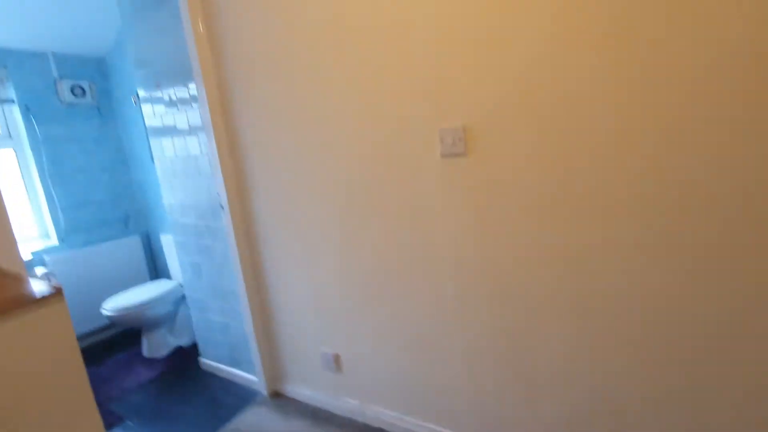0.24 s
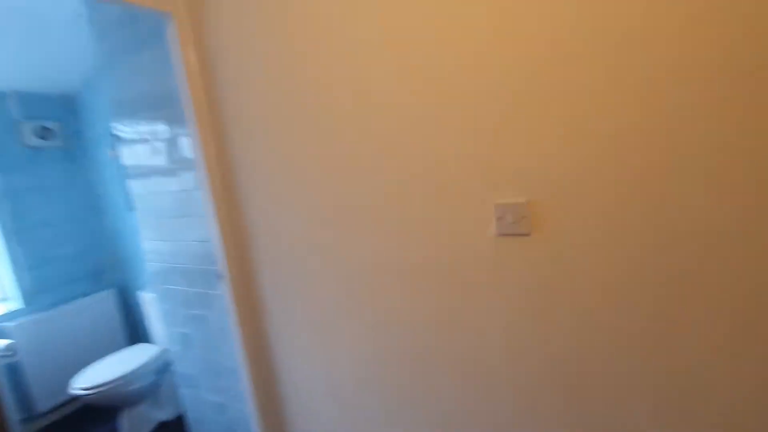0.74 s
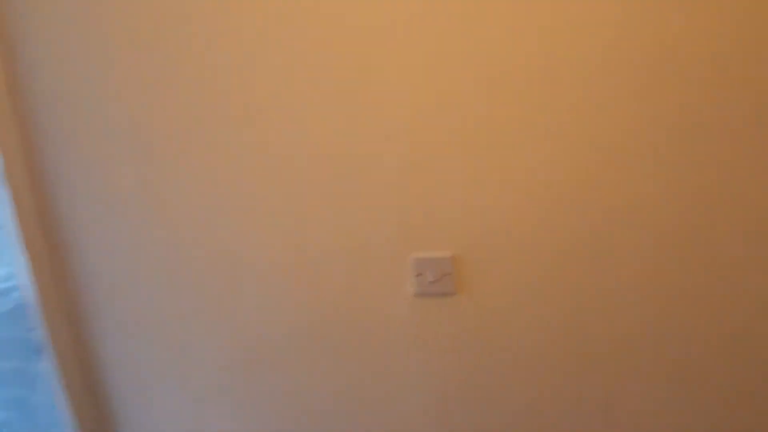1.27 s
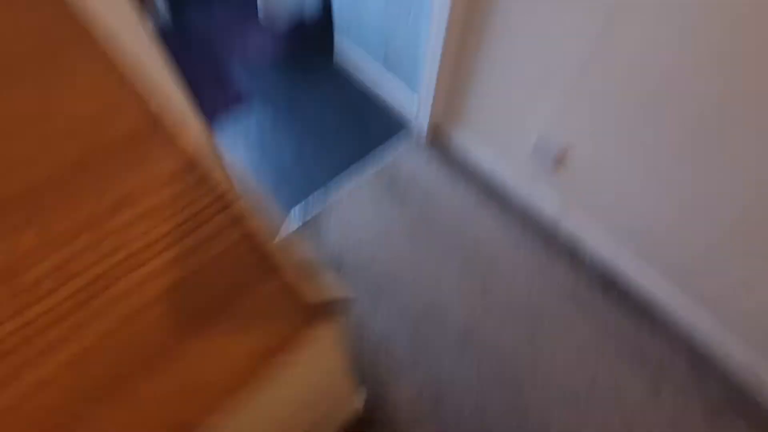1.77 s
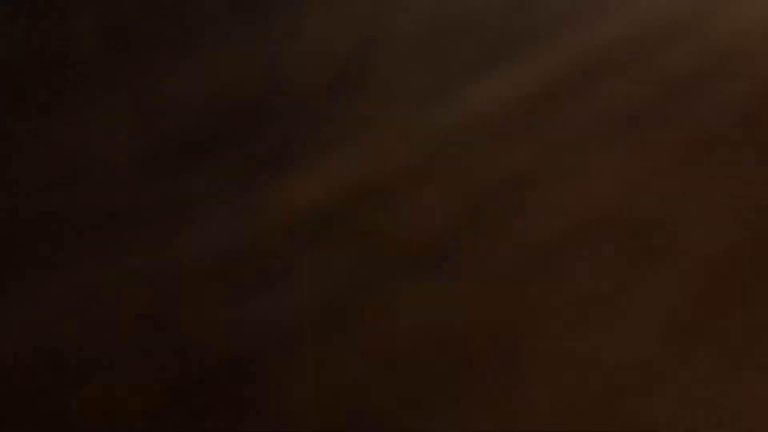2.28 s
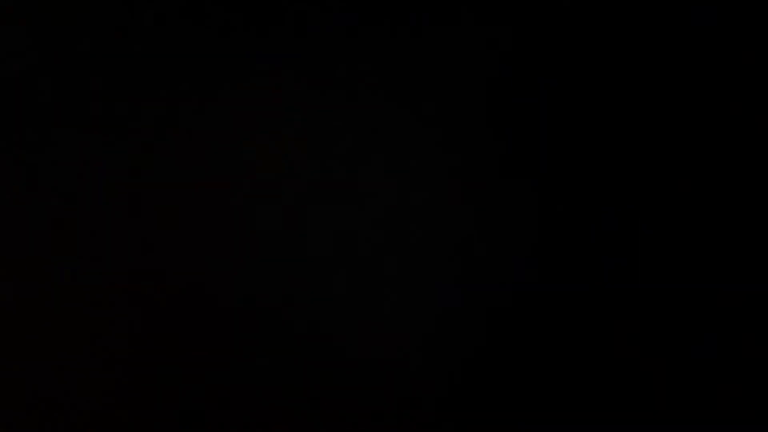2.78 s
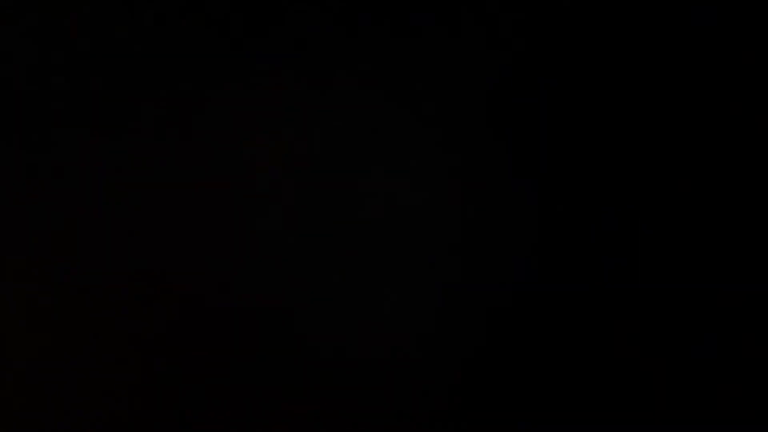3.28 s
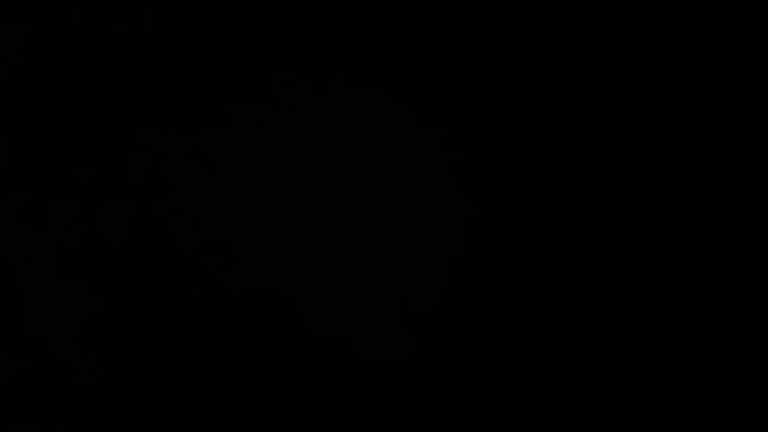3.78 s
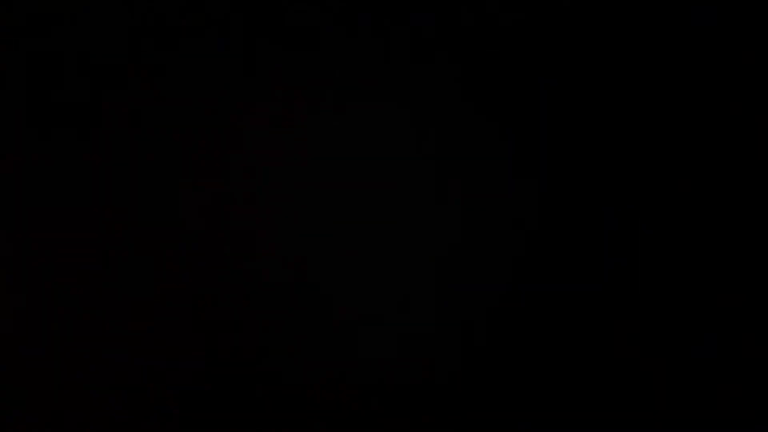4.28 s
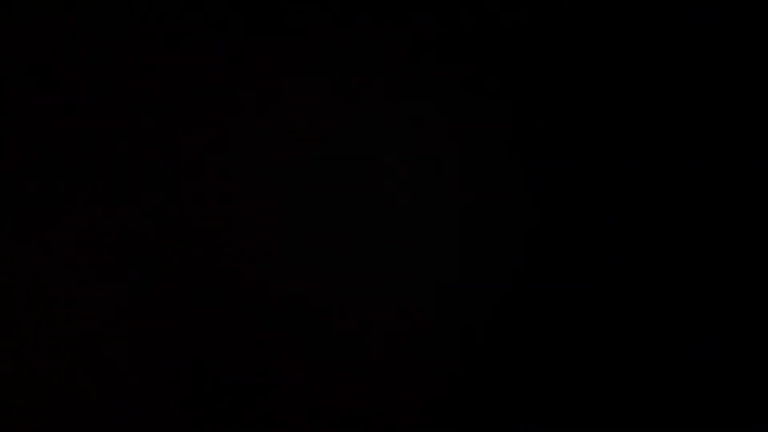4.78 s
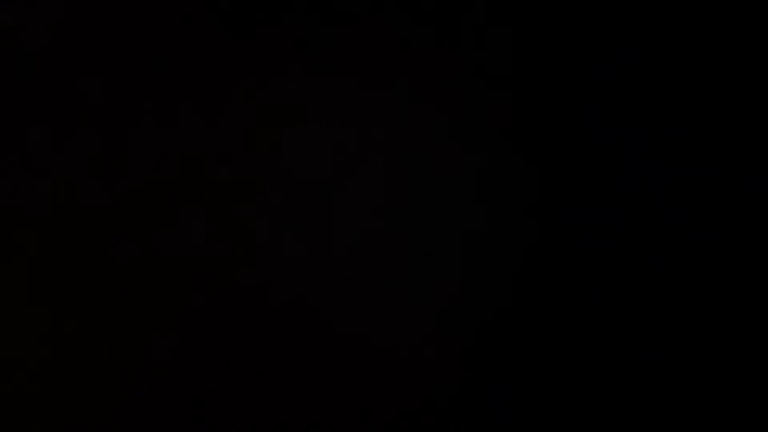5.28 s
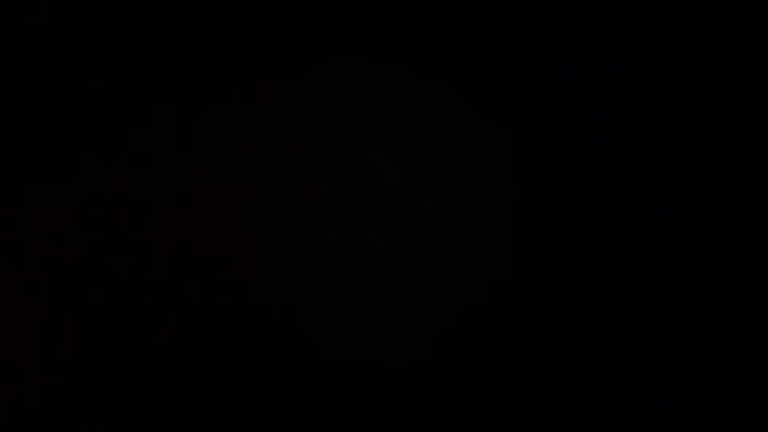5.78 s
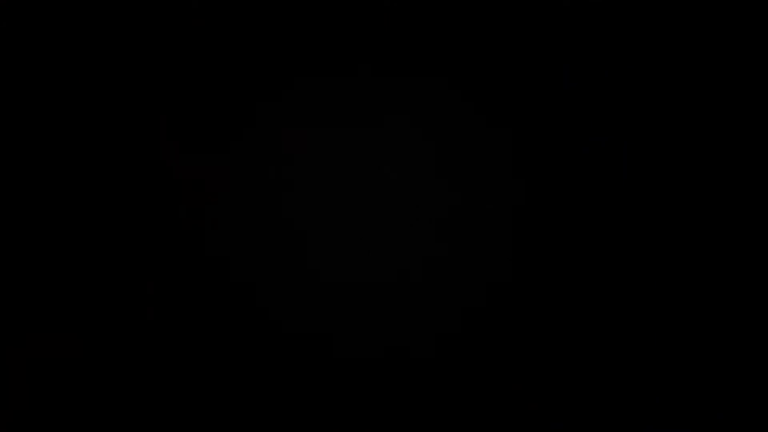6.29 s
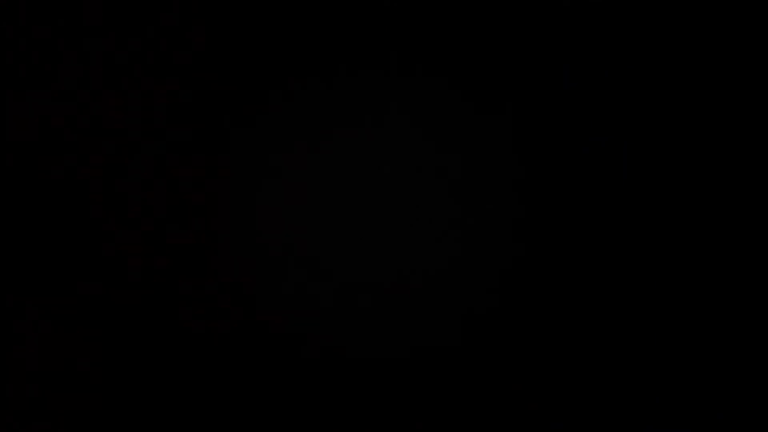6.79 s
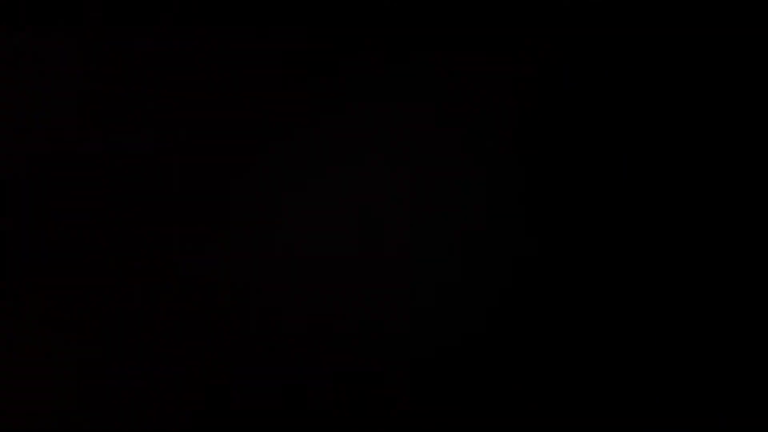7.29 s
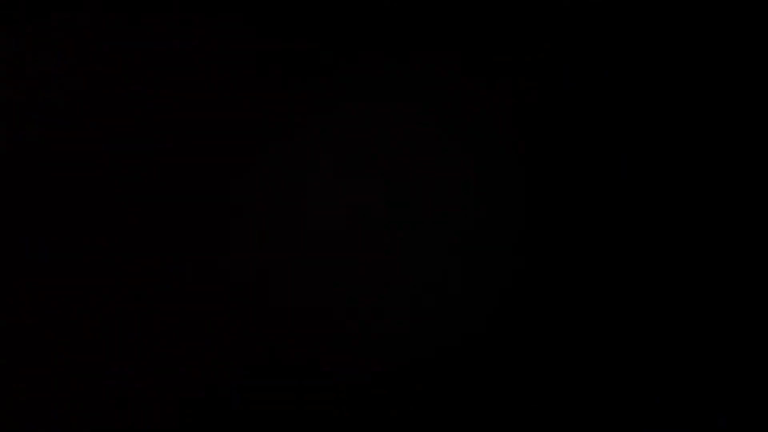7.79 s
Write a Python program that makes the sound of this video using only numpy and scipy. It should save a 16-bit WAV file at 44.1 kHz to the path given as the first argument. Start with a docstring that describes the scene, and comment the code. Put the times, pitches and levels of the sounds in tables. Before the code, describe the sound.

For the first second, soft footsteps thud and scuff on carpeted stairs, with a sleeve swishing close to a handheld phone. From about 1.4 to 2 seconds, air buffets the microphone with a low rumble as it swings down. Between 2.1 and 2.5 seconds the phone clatters onto a wooden top in several quick, hollow knocks. A quiet stretch follows, with cloth and fingers rubbing right at the microphone, small clicks, a light distant tap near 3.2 seconds and faint footfalls through the wood. At 5.7 seconds a loud bump booms through the wood and briefly rings in the small landing. Plastic case clicks, scratchy rubbing and lighter knocks follow, then more heavy bumps come at about 6.8 and 6.9 seconds. The rubbing fades over a low floor rumble, with one soft thud around 8 seconds.

```python
"""Knocks booming through a wooden top on a small landing, heard from a phone lying face down on it.
The phone is first carried by hand over carpeted stairs, with soft footfalls and a swishing sleeve.
It swings down, air buffeting its two microphone ports, and clatters onto the wood at about 2.2 s.
Then cloth and fingers rub right at the ports, the plastic case clicks, soft footfalls thud faintly
through the wood, and a few heavy bumps ring it and the room. Underneath, the floor rumbles."""
import sys
import numpy as np
from scipy import signal
from scipy.fft import rfft, irfft, next_fast_len
from scipy.io import wavfile
from scipy.ndimage import uniform_filter1d

SR = 44100
rng = np.random.default_rng(int(sys.argv[2]) if len(sys.argv) > 2 else 0)


def unload_wav(signal):
    """Save mono or channel-first audio to the path in sys.argv[1] as 16-bit WAV at rate SR, clipped to [-1, 1]."""
    wavfile.write(
        sys.argv[1],
        SR,
        np.round(np.clip(np.atleast_2d(signal).T, -1, 1) * 32767).astype(np.int16),
    )


N = 354563
T = np.arange(N) / SR
AGE = np.arange(SR) / SR  # time since a sound's onset, s
TOP_HZ = 16000  # upper limit of the microphone


# modes of the wooden top on its frame: f/Hz, level/dB, t60/s
WOOD_MODES = [(56.6, -5.5, 0.45), (86.5, -9.5, 0.17), (112.5, 7, 0.092), (147.5, 11, 0.056),
              (187, 3.5, 0.092), (237, -12, 0.42), (315.6, -5, 0.19), (406, -7, .27), (463, -8.5, 0.39),
              (634, -9.5, 0.23), (721, -17.5, 0.056)]
# knocks on the wood, and soft footfalls thudding faintly through it: t/s, boom/dB, contact bandwidth/Hz,
# boom pan/dB, room/dB, crack/dB, crack cut-off/Hz, crack pan/dB (every pan is left minus right)
KNOCKS_AND_THUDS = [(2.13, -31, 600, -26.5, -52, -35, 610, -32),
                    (2.2053, -25.5, 470, 10.5, -22.5, -25, 3384, 47),
                    (2.2897, -26, 423, 13.5, -31.5, -25.5, 3220, 24),
                    (2.303, -29.5, 300, 5.5, -40, -47, 4850, 9),
                    (2.391, -26.5, 334, 5, -29.5, -24, 3360, 27),
                    (2.5193, -32.5, 500, -13.5, -43.5, -35.5, 2900, 22),
                    (2.5304, -18.5, 481, 4, -26, -27.5, 2647, 11),
                    (3.503, -59, 70.3, 3.5, -83.5, -90.5, 500, 2),
                    (4.385, -63.5, 68.4, 1.5, -63.5, -90.5, 500, 3),
                    (5.424, -41, 210, 4, -39.5, -77, 687, 3), (5.681, -11, 248.3, 6, -25.5, -26.5, 450, 23),
                    (6.221, -47, 400, 7, -47.5, -52, 2820, 11),
                    (6.338, -48.5, 400, 5.5, -46, -58, 2430, 15),
                    (6.369, -37.5, 300, 6.5, -46.5, -52, 1000, 14),
                    (6.432, -49.5, 300, 6.5, -44.5, -52, 2000, 14),
                    (6.583, -27.5, 272.6, 8, -36.5, -40, 680, 28),
                    (6.7741, -15.5, 69, 7.5, -24.5, -29.5, 1920, 11),
                    (6.8802, -17.5, 253, 5, -26.5, -27.5, 700, 32),
                    (6.8865, -14, 312.4, 3.5, -26, -26.5, 700, 5),
                    (7.344, -50.5, 60.8, 10, -84, -97, 500, -4),
                    (8.016, -42, 58.3, -15, -56, -67, 1494, -21)]

def knocks_and_thuds():
    """Through the wood the phone lies on: knocks crack and ring it; soft footfalls stir its low modes."""
    out = np.zeros((2, N))
    for row in KNOCKS_AND_THUDS:
        start, boom_db, contact_hz, boom_pan_db, room_db, crack_db, crack_hz, crack_pan_db = row
        # each port hears the same modes in its own mixture
        wood = np.stack([ring(WOOD_MODES, scatter_db=0.54) for _ in range(2)])
        boom = burst(cut(cut(wood, contact_hz), 39, "high", order=6))
        # one sharp push, then a short chatter of the surfaces
        push = (AGE == 0) + amp(-21) * rng.standard_normal((2, SR)) * fade(0.011)
        crack = cut(push, crack_hz, order=4) + amp(1) * cut(push, crack_hz, order=2)
        crack = burst(cut(crack, 310, "high"))
        near = amp(boom_db) * pan(boom_pan_db) * boom + amp(crack_db) * pan(crack_pan_db) * crack
        room = landing_reverb(bright_hz=2.4 * contact_hz + 0.23 * crack_hz)
        add(out, start, near + amp(room_db) * pan(0.31 * boom_pan_db) * room)
    return out


# decay of the landing's diffuse tail: band top/Hz, t60/s
ROOM_DECAY = [(160, 0.45), (450, 0.3), (1100, .38), (3000, 0.25), (16000, 0.27)]
# spectrum of that tail: f/Hz, level/dB
ROOM_SPECTRUM = [(30, -28.5), (42, -9.5), (54, 7), (75, 4), (115, -5.5), (200, 0.5), (260, -0.5),
                 (315, -2.5), (390, -8.5), (600, -12), (1100, -20.5), (1600, -21), (2500, -26.5),
                 (7000, -46.5), (16000, -63.5)]
# standing waves between the walls: f/Hz, level/dB, t60/s
ROOM_MODES = [(81.3, -1, 0.33), (114.4, -4, .38), (142, -4, 0.4), (195.4, -4, 0.5), (237, -1, .38),
              (314, 0.5, 0.25), (402, -2, 0.15), (481, -7.5, 0.32), (598, -10, 0.36)]

def landing_reverb(bright_hz):
    """All round the phone: the landing's answer builds briefly, and the bass lasts longest."""
    rest, tail = noise(SR, alike_hz=240), 0
    for top_hz, t60 in ROOM_DECAY:
        band = cut(cut(rest, top_hz)[:, ::-1], top_hz)[:, ::-1]  # both ways, so no phase shift
        rest = rest - band
        tail = tail + band * fade(t60)
    standing = np.stack([ring(ROOM_MODES, scatter_db=4.5) for _ in range(2)])
    standing *= 1 - np.exp(-AGE / 0.0091)
    diffuse = colour(tail * (1 - np.exp(-AGE / 0.0018)), ROOM_SPECTRUM)
    return burst(cut(burst(diffuse) + amp(-3) * burst(standing), bright_hz))


# footfalls on the stairs: t/s, thud/dB, scuff/dB, rise/s, decay/s
STEPS = [(0.0, -28.5, -47.5, 0.00034, 0.31), (0.059, -33.5, -48.5, 0.084, 0.067),
         (0.134, -30.5, -42, 0.044, 0.06), (0.196, -31, -44.5, 0.0045, 0.028),
         (.6005, -29, -39.5, 0.0055, 0.12), (.745, -36.5, -49.5, 0.017, 0.07),
         (.79, -36.5, -43, 0.016, 0.02), (1.788, -37, -39, 0.0017, 0.013),
         (3.9, -54.5, -66.5, 0.018, 0.098), (4.766, -57.5, -50, 0.051, 0.02)]
# spectra of the padded thud and of the sole's scuff: f/Hz, level/dB
THUD_SPECTRUM = [(25, -12.5), (55, -3.5), (90, 10), (150, 3), (220, 1), (310, 2), (450, -6), (700, -14),
                 (1400, -27.5), (4000, -62)]
SCUFF_SPECTRUM = [(200, -33), (700, 4), (1500, -3.5), (2700, -6), (4200, -13.5), (6300, -17.5),
                  (7600, -27.5), (11000, -26.5), (16000, -55.5)]

def footsteps():
    """On the stairs nearby: each foot thuds into the carpet and scuffs its fibres."""
    out = np.zeros((2, N))
    stairwell = amp(-3) * fade(0.44)  # both sounds linger
    for start, thud_db, scuff_db, rise, decay in STEPS:
        release = np.exp(-np.maximum(AGE - rise, 0) / decay)
        press = np.minimum(AGE / rise, 1) * (release + stairwell)
        thud = burst(colour(noise(SR, alike_hz=350) * press, THUD_SPECTRUM))
        scuff = burst(colour(noise(SR, alike_hz=600) * press, SCUFF_SPECTRUM))
        add(out, start, amp(thud_db) * thud + amp(scuff_db) * pan(db=-4) * scuff)
    return out


# puffs of air on the microphone: peak t/s, level/dB, rise/s, fall/s
GUSTS = [(1.44, -38, 0.043, 0.14), (1.535, -26.5, 0.043, 0.031), (1.597, -22.5, 0.049, 0.04),
         (1.68, -22.5, 0.063, 0.049), (1.754, -25, 0.064, 0.057), (1.855, -30.5, 0.064, .035),
         (1.98, -43.5, 0.084, 0.13)]
# spectrum of the buffeting: f/Hz, level/dB
AIR_SPECTRUM = [(20, -12.5), (45, 10.5), (75, 11.5), (120, 0), (200, -7), (400, -33), (1200, -67),
                (5000, -81)]

def air_buffets():
    """On the microphone itself: eddies hit the ports as the phone swings down, right port leading."""
    eddies = unit(colour(noise(N, alike_hz=39.9), AIR_SPECTRUM))
    return np.sqrt(swell_power(GUSTS)) * pan(db=-30.5) * eddies


# clicks of the case: t/s, level/dB, decay/s, ring f/Hz, pan/dB, body relative to level/dB
CLICKS = [(1.778, -52, 0.00078, 10500, -18, -7), (2.103, -54.5, 0.00033, 4940, -12, 0),
          (2.256, -52.5, 0.00034, 2500, -6, -10), (2.414, -51.5, 0.0024, 2960, 13, -15),
          (2.489, -48, 0.0034, 1900, -11, -10), (2.553, -64.5, .0005, 9100, 10, -20),
          (2.828, -67, 0.0023, 3500, -18.5, 1), (4.521, -53.5, 0.001, 1690, -20, -2),
          (4.583, -59, 0.0012, 5000, -5, 1.5), (4.615, -57, 0.0016, 3000, -7, 2.5),
          (5.882, -45, 0.0016, 5500, 4, 9.5), (5.889, -28.5, 0.0032, 1900, 4, -9),
          (5.9359, -41.5, 0.001, 1350, 4, -2), (5.9547, -41.5, 0.0015, 2500, 1, -18),
          (5.987, -43, 0.0025, 1690, -14, -33), (6.014, -40.5, 0.00054, 9300, -12, -18),
          (6.027, -45.5, 0.005, 2900, -4, -13), (6.194, -53.5, 0.0017, 1500, -2, 2.5),
          (6.221, -58.5, 0.0019, 1690, -2, -4), (6.3378, -43, 0.0017, 2250, 2, -12),
          (6.415, -49.5, 0.0014, 1800, -15, -17), (6.436, -35, 0.0021, 1740, -8.5, -21),
          (6.602, -56, .0008, 9100, 0, 12.5), (6.7753, -35.5, 0.0018, 2095, 5, -4)]
# spectrum of snapping plastic: f/Hz, level/dB
CASE_SPECTRUM = [(200, -32.5), (700, -20.5), (1700, 5), (3000, -1.5), (4300, -4.5), (6200, -0.5),
                 (7700, -10.5), (11500, -5.5), (16000, -21)]
# modes of the hollow under the phone: f/Hz, level/dB, t60/s
CAVITY_MODES = [(410, -3.5, 0.24), (489, 1, 0.27), (523, -1.5, .2), (610, -3.5, .22)]

def case_clicks():
    """At the microphone: the plastic case slips, snaps and rings; its hollow body adds a low note."""
    out = np.zeros((2, N))
    for start, db, decay, ring_hz, pan_db, body_db in CLICKS:
        envelope = np.exp(-AGE / decay) + amp(-38.5) * fade(0.25)
        snap = colour(noise(SR, alike_hz=500) * envelope, CASE_SPECTRUM)
        click = burst(burst(snap) + amp(-5.5) * burst(resonate(snap, ring_hz, q=2)))
        puff = noise(SR, alike_hz=400) * fade(0.064)
        puff = cut(cut(puff, 740, order=4), 370, "high", order=4)
        body = burst(burst(puff) + amp(-5) * burst(ring(CAVITY_MODES, scatter_db=3)))
        add(out, start, amp(db) * (pan(pan_db) * click + amp(body_db) * body))
    return out


# strokes on the case: peak t/s, cloth/dB, hiss/dB, rasp/dB, rise/s, fall/s, pan/dB
STROKES = [(2.136, -42.5, -43, -49, 0.017, 0.12, -22.5), (2.365, -44, -48, -52, 0.11, 0.11, -5.5),
           (2.51, -55, -63.5, -55.5, 0.11, 0.1, -0.5), (2.744, -63.5, -68, -69.5, 0.053, 0.23, -4),
           (3.14, -73, -77.5, -81.5, 0.25, 0.85, -2), (3.53, -76, -75.5, -98, 0.12, 0.25, 4),
           (3.717, -60, -58, -64, 0.047, 0.096, 5), (3.97, -67.5, -75.5, -72.5, 0.5, 0.31, 1),
           (4.52, -59, -59.5, -72, 0.13, 0.2, -1), (4.64, -52, -52, -53, 0.09, 0.05, 5.5),
           (4.8, -56, -61, -50, 0.079, 0.098, 2.5), (4.899, -55.5, -60.5, -65, 0.26, 0.22, 0),
           (5.037, -58, -68, -74, 0.063, 0.17, -1.5), (5.44, -51.5, -68, -72.5, 0.14, 0.14, 3.5),
           (5.666, -41, -45, -47, 0.19, 0.13, 0.5), (5.77, -50.5, -55.5, -46.5, 0.26, 0.19, -2.5),
           (5.91, -43, -49, -41.5, 0.049, 0.14, -1), (6.01, -45.5, -47, -47.5, 0.13, 0.081, -2.5),
           (6.24, -54.5, -60.5, -54, 0.15, .11, 1), (6.426, -47.5, -53, -45, 0.13, 0.083, -0.5),
           (6.66, -53, -58, -52, 0.28, 0.3, -2), (6.811, -47, -55.5, -48.5, 0.13, 0.19, 4.5),
           (7.0, -59, -76.5, -62, 0.2, 0.2, 1), (7.19, -67.5, -73.5, -71, .25, 0.28, -0.5),
           (7.491, -65, -67.5, -62, 0.16, 0.063, -3), (7.8, -68, -59.5, -61.5, 0.1, 0.15, -11.5),
           (8.03, -66, -61, -66, 0.089, .1, -7)]
# spectra of cloth, fine hiss, coarse weave and the gap under the phone: f/Hz, level/dB
CLOTH_SPECTRUM = [(100, 3), (240, 4.5), (380, -2.5), (550, 2), (750, 3), (1050, -3), (1700, -7), (3000, -1),
                  (4500, -1), (6300, -7), (7600, -18.5), (11000, -41), (16000, -44.5)]
HISS_SPECTRUM = [(3000, -35.5), (6500, 4), (8000, 1), (10000, 2.5), (13500, 0), (16000, -8.5)]
RASP_SPECTRUM = [(400, -25.5), (900, -4.5), (1600, -1.5), (2500, -3.5), (3600, -11.5), (7000, -31)]
GAP_SPECTRUM = [(150, -14.5), (250, 3.5), (370, -3.5), (530, 5.5), (700, -5.5), (1000, -13.5),
                (1600, -19.5), (3000, -31), (8000, -67)]

def rubbing():
    """Right at the ports: cloth and skin slide on the case with a fine hiss, and coarse weave rasps."""
    cloth_power, hiss_power, rasp_power = np.zeros((3, 2, N))
    for peak, cloth_db, hiss_db, rasp_db, rise, fall, pan_db in STROKES:
        power = (pan(pan_db) * swell(peak, rise, fall)) ** 2
        cloth_power += amp(cloth_db) ** 2 * power
        hiss_power += amp(hiss_db) ** 2 * power
        rasp_power += amp(rasp_db) ** 2 * power
    cloth = np.sqrt(cloth_power) * friction(CLOTH_SPECTRUM, slip_db=-8, flutter_db=1.5)
    hiss = np.sqrt(hiss_power) * friction(HISS_SPECTRUM, slip_db=-8, flutter_db=2.5)
    rasp = np.sqrt(rasp_power) * friction(RASP_SPECTRUM, slip_db=-3, flutter_db=1.5)
    # the gap under the phone sounds hollow even at the lightest touch
    touch = np.sqrt(cloth_power.mean(axis=0)) ** 0.59
    hollow = amp(-30.5) * touch * friction(GAP_SPECTRUM, slip_db=-11.5, flutter_db=3.5)
    return cloth + hiss + rasp + hollow


# brief touches: t/s, length/s, level/dB, centre f/Hz, resonator width/Hz, attack/s, release/s, pan/dB
BRUSHES = [(.22, 0.086, -58.5, 12900, 6000, .05, .03, -3), (1.692, .045, -50, 3840, 2600, .008, 0.033, -15),
           (2.724, 0.019, -68, 11400, 8000, 0.0033, 0.054, -8),
           (3.681, 0.066, -59, 12350, 8000, .006, .01, -2), (3.871, .11, -64, 1100, 1410, .02, .04, 1),
           (4.438, 0.16, -59.5, 950, 1100, 0.038, .04, 3), (4.584, .04, -59, 11500, 3000, .005, .01, -5),
           (4.632, 0.024, -46, 12800, 5000, .012, .005, -3),
           (4.773, 0.077, -55, 1400, 1800, .025, 0.021, 5), (5.0, 0.13, -65, 610, 500, 0.026, 0.053, 0),
           (6.778, 0.025, -40.5, 1650, 2000, .003, .03, 3)]

def brushes():
    """Close up: a fingertip or cuff grips, slides and lets go, each in its own band of friction noise."""
    out = np.zeros((2, N))
    for start, length, db, centre_hz, width_hz, attack, release, pan_db in BRUSHES:
        slide = np.minimum(AGE / attack, 1) * np.exp(-np.maximum(AGE - length, 0) / release)
        grain = noise(SR, alike_hz=500) * amp(2 * wander(rate_hz=140)[:SR])
        q = centre_hz / width_hz
        band = resonate(resonate(grain, centre_hz, q), centre_hz, q)
        broad_hiss = amp(-21) * unit(grain)
        add(out, start, amp(db) * pan(pan_db) * slide * (unit(band) + broad_hiss))
    return out


# swishes, one for each move of the arm: peak t/s, level/dB, rise/s, fall/s
SWISHES = [(0.024, -41.5, 0.043, 0.096), (.29, -46.5, 0.14, 0.15), (0.798, -65, 1, 0.71),
           (1.244, -48.5, 0.059, 0.13), (1.5, -54.5, 0.21, 0.11), (1.725, -48.5, 0.14, 0.17),
           (2.03, -56.5, 0.083, 0.12)]
# spectrum of the sleeve's fabric: f/Hz, level/dB
SLEEVE_SPECTRUM = [(150, 2), (300, 5), (600, 1), (1150, -5.5), (1480, 2), (1850, -7.5), (2700, -6),
                   (4000, -6), (6200, -8), (7600, -17), (10500, -14), (16000, -29.5)]
CARRY_DB, SET_DOWN_S = -63, 2.1

def sleeve():
    """Within arm's length, on the right: the sleeve swishes, and rustles while the phone is carried."""
    carried = uniform_filter1d(1. * (T < SET_DOWN_S), size=4410)
    power = amp(CARRY_DB) ** 2 * carried + swell_power(SWISHES)
    fabric = friction(SLEEVE_SPECTRUM, slip_db=-10.5, flutter_db=1.4)
    return np.sqrt(np.abs(power)) * pan(db=-5.5) * fabric


# spectrum of a dry tick on wood: f/Hz, level/dB
TICK_SPECTRUM = [(1200, -16), (3000, -3.5), (6500, -2), (9000, -10)]
TAP_S = 3.192

def distant_tap():
    """Further off: one light tap on hollow wood gives a tick, a dull note and the room's bright answer."""
    out = np.zeros((2, N))
    tick = burst(colour(noise(SR, alike_hz=500) * fade(0.0084), TICK_SPECTRUM))
    room = burst(colour(noise(SR, alike_hz=500) * fade(0.4), TICK_SPECTRUM))
    note = resonate(noise(SR, alike_hz=500) * fade(0.28), hz=476, q=5)
    note = burst(cut(note, 700))
    add(out, TAP_S, amp(-58.5) * pan(db=-8) * tick + amp(-52.5) * note + amp(-62.5) * room)
    return out


# low swells of the floor, from shifting weight and its ringing after the last heavy bump:
# peak t/s, level/dB, rise/s, fall/s
FLOOR_SWELLS = [(.11, -44, .07, .16), (1.32, -45.5, 0.086, 0.07), (2.369, -40, 0.21, 0.16),
                (2.7, -43, 0.088, 0.14), (3.699, -59, 0.26, 0.73), (4.03, -56.5, 0.25, 0.2),
                (4.41, -50.5, 0.042, 0.63), (4.701, -59, 0.31, 0.27), (5.04, -60, 0.29, 0.12),
                (5.47, -42.5, 0.16, 0.18), (5.949, -44.5, 0.32, 0.26), (7.05, -42, 0.11, 0.13),
                (7.78, -62, 0.1, 0.27)]
# spectrum of the floor's rumble: f/Hz, level/dB
FLOOR_SPECTRUM = [(20, -28), (40, -9.5), (58, 3), (100, -11), (160, -14.5), (400, -30), (1200, -52),
                  (5000, -83.5)]

def floor_rumble():
    """Below the phone: the floor's rumble swells under shifting weight and after knocks and thuds."""
    power = swell_power(FLOOR_SWELLS)[None] + amp(-76.5) ** 2
    for start, boom_db, *_ in KNOCKS_AND_THUDS:
        joists = amp(boom_db - 20) * fade(t60=0.73)
        add(power, start, joists[None] ** 2)
    return np.sqrt(power) * unit(colour(noise(N, alike_hz=184), FLOOR_SPECTRUM))


def background_hiss():
    """Behind everything: a faint, even hiss."""
    return amp(-81.5) * unit(cut(noise(N, alike_hz=300), 3000, order=1))


def ring(modes, scatter_db):
    """Modes set swinging together, a little different in pitch and strength each time."""
    hz, db, t60 = np.transpose(modes)[:, :, None]
    detune, strength = rng.standard_normal((2, len(modes), 1))
    tones = np.sin(2 * np.pi * hz * (1 + 0.015 * detune) * AGE)
    return np.sum(amp(db + scatter_db * strength) * fade(t60) * tones, axis=0)


def friction(spectrum, slip_db, flutter_db):
    """Fibres sliding: a bed of tiny slips with a few larger catches, under unsteady pressure."""
    caught = rng.random(N) < 900 / SR  # about 900 catches a second
    strength = amp(1.1 * np.minimum(rng.exponential(size=N), 4))
    catches = caught * strength * rng.standard_normal((2, N))
    grain = unit(noise(N, alike_hz=450)) + amp(slip_db) * unit(catches)
    pressure = amp(flutter_db * wander(rate_hz=45))
    return unit(colour(grain * pressure, spectrum))


def swell(peak, rise, fall):
    """A sound grows and dies away; it is 20 dB down one rise before and one fall after its peak."""
    away = np.maximum((peak - T) / rise, (T - peak) / fall)
    near, out = away < 4, np.zeros(N)
    out[near] = amp(-20 * away[near] ** 1.29)  # exponent 1 gives a pointed top, 2 a bell
    return out


def swell_power(swells):
    """Summed power of several swells."""
    return sum((amp(db) * swell(peak, rise, fall)) ** 2 for peak, db, rise, fall in swells)


def noise(size, alike_hz):
    """Noise at two ports: alike in the bass, unrelated above alike_hz."""
    mid, side = rng.standard_normal((2, size))
    return mid + np.array([[1], [-1]]) * cut(side, alike_hz, "high", order=1)


def wander(rate_hz):
    """Smooth random drift with a spread near 1."""
    size = max(int(SR / rate_hz), 1)
    held = np.repeat(rng.standard_normal(N // size + 1), size)
    return unit(uniform_filter1d(held, size))[:N]


def colour(x, spectrum):
    """Minimum-phase filter through (Hz, dB) points."""
    n = 2 * next_fast_len(x.shape[-1] // 2 + 4096)
    hz, db = np.transpose(spectrum)
    gain_db = np.interp(np.log(np.arange(n // 2 + 1) * SR / n + 1), np.log(hz), db)
    cepstrum = irfft(np.log(amp(gain_db)))
    cepstrum[1:n // 2] *= 2
    cepstrum[n // 2 + 1:] = 0
    return irfft(rfft(x, n) * np.exp(rfft(cepstrum)))[..., :x.shape[-1]]


def cut(x, hz, kind="low", order=2):
    """Low-pass or high-pass."""
    sections = signal.butter(order, min(hz, SR / 2 - 1), kind, fs=SR, output="sos")
    return signal.sosfilt(sections, x + 1e-18)


def resonate(x, hz, q):
    """Band-pass through one resonance."""
    return signal.lfilter(*signal.iirpeak(hz, q, fs=SR), x)


def fade(t60):
    """Decay by 60 dB in t60 seconds."""
    return np.exp(-np.log(1000) * AGE / t60)


def amp(db):
    """Decibels to gain."""
    return 10 ** (np.asarray(db) / 20)


def unit(x):
    """Scale to rms 1."""
    return x / np.sqrt(np.mean(x ** 2))


def burst(x):
    """Scale a short sound to the energy of 40 ms at rms 1."""
    return x / np.sqrt(np.mean(np.sum(x ** 2, axis=-1)) / (0.04 * SR))


def pan(db):
    """Constant-power gains for a level difference, left minus right."""
    gains = amp(np.array([[1], [-1]]) * db / 2)
    return gains / np.sqrt(np.mean(gains ** 2, axis=0))


def add(out, start, sound):
    """Mix a sound in at start seconds."""
    i = int(np.clip(start * SR, 0, N - 1))
    out[:, i:i + sound.shape[1]] += sound[:, :N - i]


def scene():
    """Stairs and landing as they reach the phone's two ports."""
    walking = footsteps() + sleeve()
    impacts = knocks_and_thuds() + case_clicks() + distant_tap()
    handling = rubbing() + brushes() + air_buffets()
    return impacts + walking + handling + floor_rumble() + background_hiss()


def record(dry):
    """The phone's microphone drops the deepest bass, clips the highest peaks and cuts the top."""
    clipped = np.clip(cut(dry, 21, "high"), -0.88, 0.88)
    return signal.sosfilt(signal.ellip(8, 0.2, 70, TOP_HZ, fs=SR, output="sos"), clipped)


dry = scene()
out = record(dry)
unload_wav(out)
```